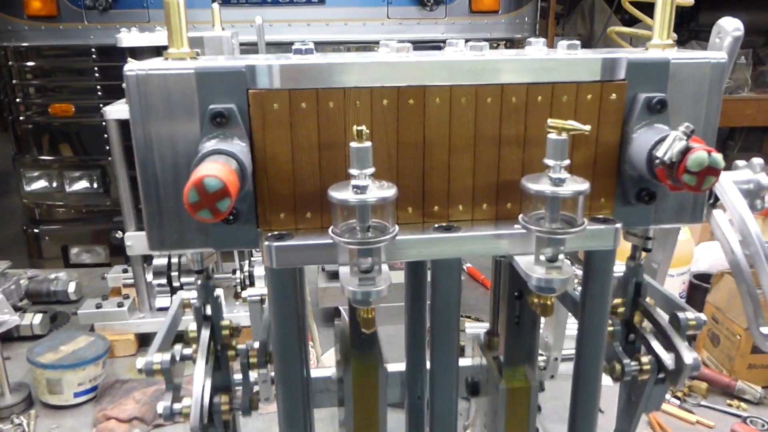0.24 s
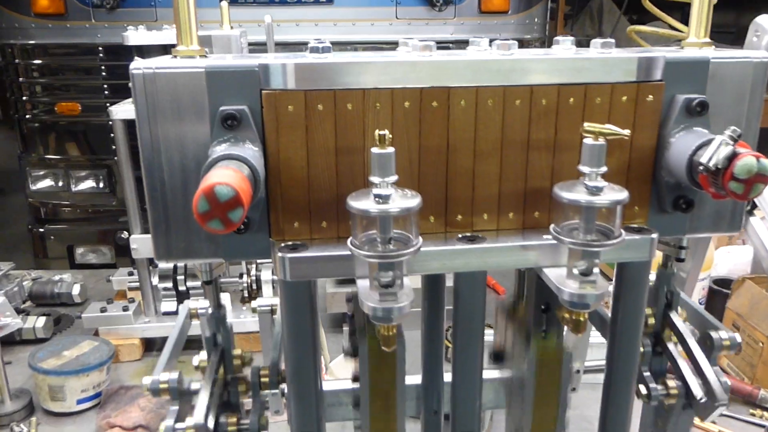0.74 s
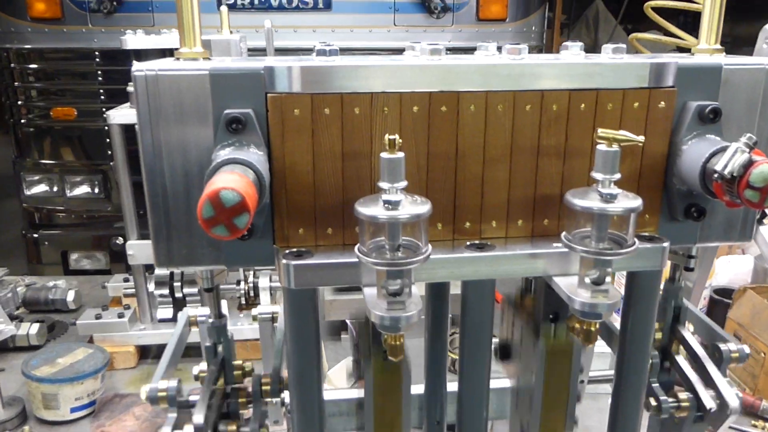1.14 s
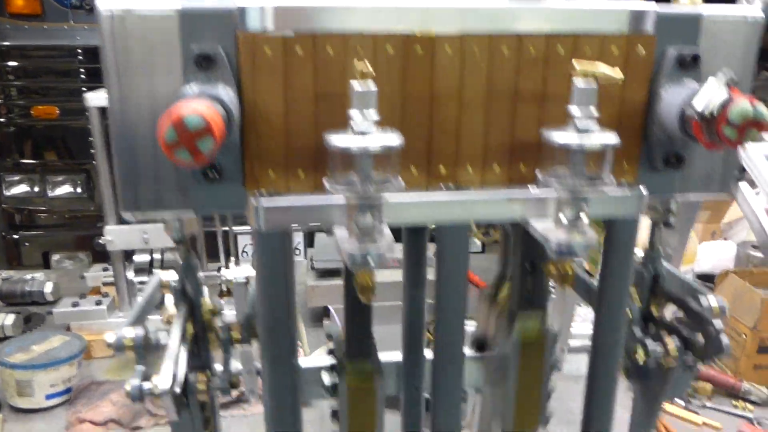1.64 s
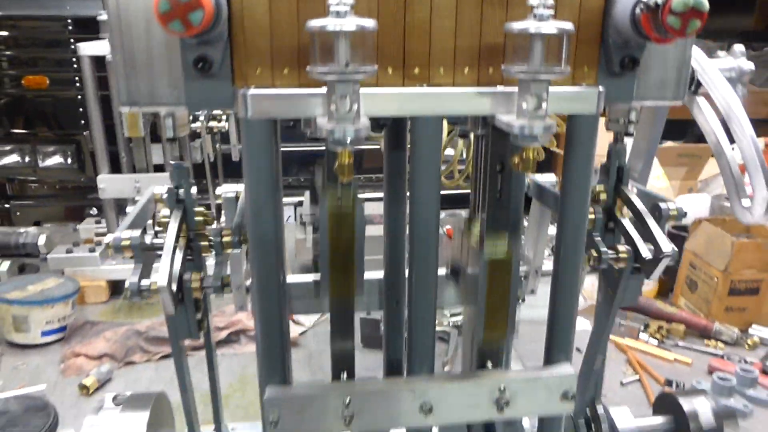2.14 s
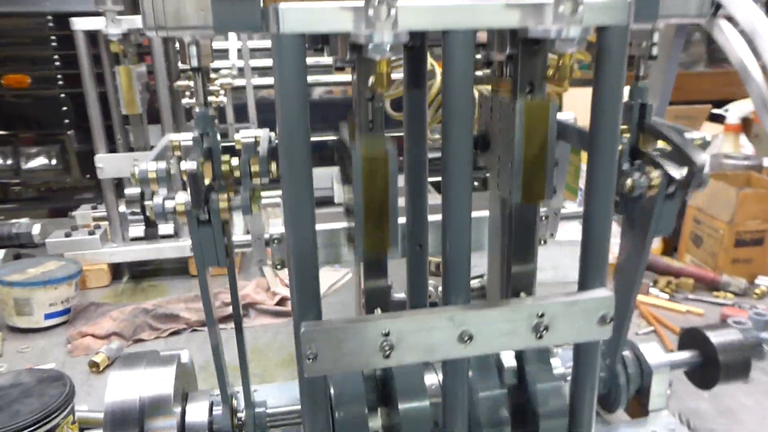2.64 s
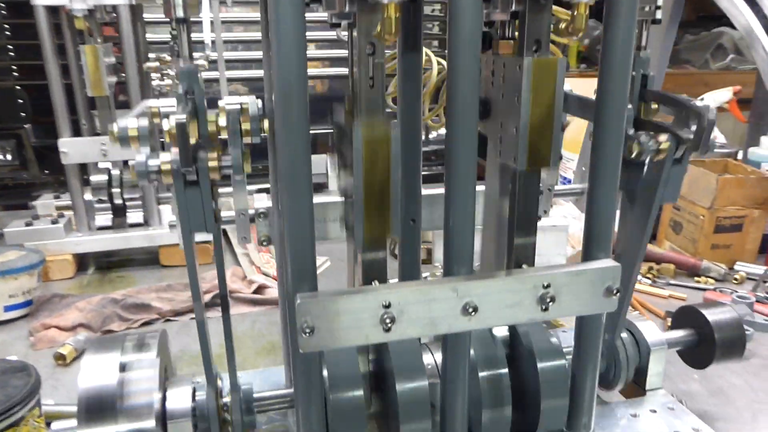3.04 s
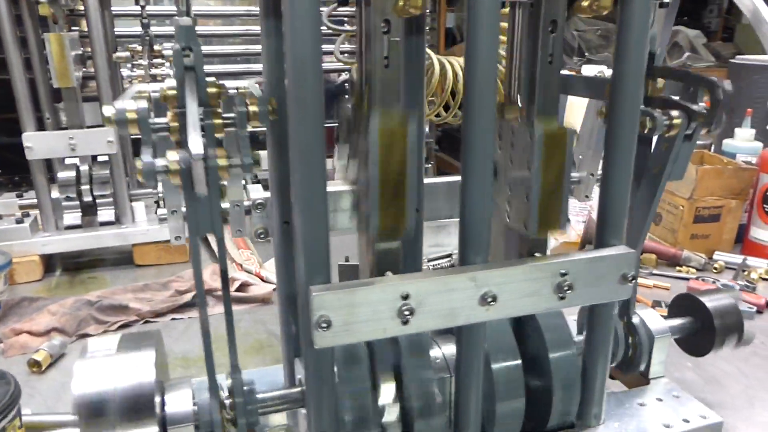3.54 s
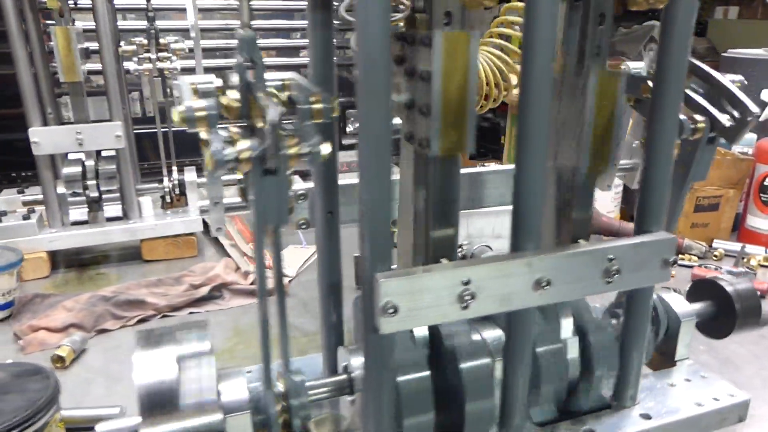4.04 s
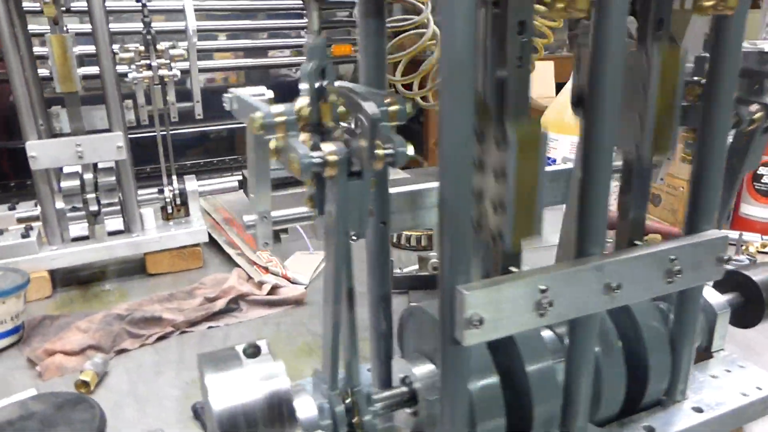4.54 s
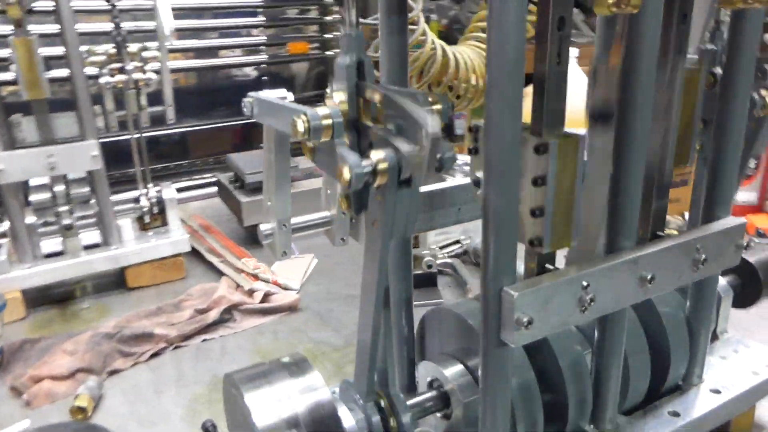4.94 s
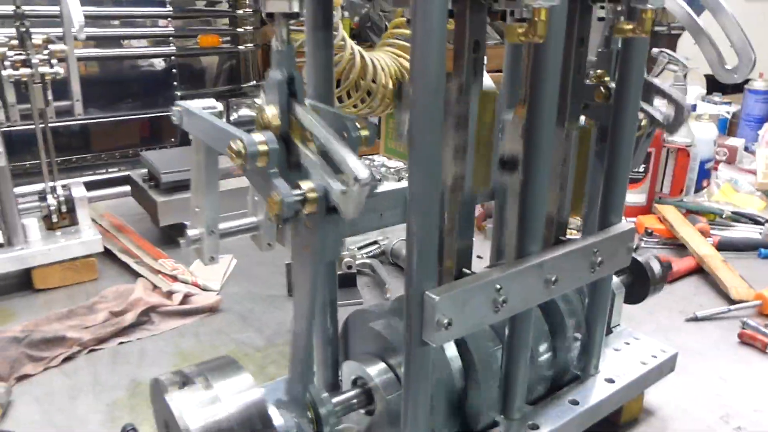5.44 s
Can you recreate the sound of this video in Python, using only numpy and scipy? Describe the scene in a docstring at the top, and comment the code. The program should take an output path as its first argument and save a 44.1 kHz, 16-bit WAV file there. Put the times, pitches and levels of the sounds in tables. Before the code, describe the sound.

Fast, even mechanical knocking from a little bench steam engine, with soft steam chuffs, leaking hiss, valve-gear rattle and stray metallic ticks.

```python
"""Small steam engine on a bench

A two-cylinder engine runs steadily, close by, at about 163 turns a minute over a rush of noise and faint tones.
Crank angle times damped double knocks, bed thuds, the valve gear's rattle and small chattering contacts.
It also shapes filtered noise into port chuffs, a leaking jet's high hiss, and rubbing and scuffing slides.
A loose link ticks and a dry guide scrapes at listed times; short diffuse reflections surround it all."""
import sys
import numpy as np
from scipy import signal
from scipy.fft import rfft, irfft
from scipy.io import wavfile

SR = 44100
rng = np.random.default_rng(int(sys.argv[2]) if len(sys.argv) > 2 else 0)


def digitize_waveform(pressure):
    """Quantize a signal to 16-bit integers and store it at the path in sys.argv[1].

    Rows of a 2-D input are taken as channels; values are limited to [-1, 1].
    """
    field = np.atleast_2d(pressure).T
    bounded = np.clip(field, -1, 1)
    quanta = np.round(bounded * 32767).astype(np.int16)
    wavfile.write(sys.argv[1], SR, quanta)


N = 250488
TIME = np.arange(N) / SR
FREQ = np.fft.rfftfreq(N, 1 / SR)

# The flywheel holds its speed, then sags a little. Each row: time in seconds, speed in turns a minute.
SPEED_RPM = [(4.17, 163.3), (5.47, 162.55)]
# Crank angles of the four dead centres. Each entry: angle in degrees.
BLOW_ANGLES_DEG = [0, 93.6, 193.4, 277.8]
# Crank angles of the bearing rebounds, one after each dead centre. Each entry: angle in degrees.
REBOUND_ANGLES_DEG = [4.3, 98.2, 197, 281.4]
# Bearing blow at each dead centre. Each row: mean pitch in Hz, time constant in ms, mean peak in dB.
BLOWS = [(397, 0.8, -18.5), (383, 0.85, -26), (391, 0.77, -21.5), (390, 0.63, -24.5)]
# Bearing rebound after each blow. Each row: mean pitch in Hz, time constant in ms, mean peak in dB.
REBOUNDS = [(550, 0.75, -24), (550, 0.38, -24), (470, 0.44, -31.5), (573, 0.42, -24)]
# Valve gear contacts, once a turn each. Each entry: mean crank angle in degrees.
RATTLE_ANGLES_DEG = [313, 314.8, 317, 318.8, 321.5, 325]
# Stray ticks of a loose link. Each row: time in seconds, pitch in Hz, time constant in ms, peak in dB.
TICKS = [(0.1924, 2360, 0.46, -23), (0.4581, 1230, 0.17, -18), (0.5467, 1900, 0.23, -17),
         (0.944, 2700, 0.55, -24.5), (1.1982, 2790, 0.46, -23.5), (2.054, 2420, 0.82, -18.5),
         (3.3808, 1120, 0.3, -25.5), (3.5036, 2380, 0.47, -23), (4.1321, 1120, 0.3, -21),
         (4.241, 2500, 0.12, -16), (4.4845, 1080, 0.35, -26), (5.1885, 566, 0.72, -20),
         (5.212, 2360, 0.29, -18.5), (5.212, 990, 0.62, -20), (5.6002, 980, 0.84, -26),
         (5.6513, 1070, 0.22, -18.5)]
# Ring of the valve links. Each row: mean pitch in Hz, mean relative level in dB, t60 in seconds.
LINK_MODES = [(200, 4.5, 0.055), (440, 9, 0.023), (690, -5, 0.014), (856, 13, 0.02), (1024, 18, 0.016),
              (1320, 10, 0.0029), (1930, -9, 0.015), (2180, 4, 0.027), (3200, -23, .006), (4600, -48, .005)]
# Drift of the jet's hiss. Each row: time in seconds, pitch in Hz, relative level in dB.
JET_DRIFT = [(0, 13300, -35), (1.3, 13440, -32), (2.65, 12900, -35.5), (3.5, 13900, -30.5),
             (3.88, 14240, -28), (4.25, 14100, -31.5), (4.55, 13550, -36.5), (5.05, 14380, -35),
             (5.68, 14400, -38.5)]
# Flow through the leaking gap. Each row: start in crank degrees, end in crank degrees, relative level in dB.
LEAKS = [(-70, 0, -14), (-12, 26, -6.5), (5, 103, -.5), (101, 111.5, 1), (102, 123, -6.5),
         (171.5, 282, -.7), (282, 296, -8)]
# Resonances of the port passages. Each row: pitch in Hz, width in Hz, relative level in dB.
PORT_MODES = [(1034, 350, 0), (2380, 290, 1), (3750, 210, 3.5), (4690, 163, 3.5), (5240, 90, 3.5),
              (5600, 480, 0.5), (7200, 100, 1.5), (9310, 200, -3.5)]
# Steam phases at a dead centre: seep, lead, admission, stroke.
# Each row: start in degrees after the dead centre, end in degrees after it.
PORT_PHASES = [(-22, 2), (-8.5, 1), (5, 29), (0, 72)]
# Flow at each dead centre. Each row: seep, lead, admission and stroke, all relative levels in dB.
PORT_FLOWS = [(-42.5, -32.5, -35.5, -45.5), (-45.5, -37.5, -44, -43.5), (-51, -43.5, -55, -43),
              (-55, -56, -50, -73)]
# Slow change in the chuffs. Each row: time in seconds, relative level in dB.
PORT_LEVEL = [(0, -5), (1.2, -2.5), (2.8, -0.6), (3.5, 2.5), (5.68, -1.5)]
# Crosshead rub. Each row: start in crank degrees, end in crank degrees, mean level in dB.
RUBS = [(-36, -3, -43), (11, 27.5, -39.5), (26, 34.5, -39.5), (64, 156, -43), (120.5, 131, -35.5),
        (141, 292, -46)]
# Crosshead scuff. Each row: start in crank degrees, end in crank degrees, mean level in dB.
SCUFFS = [(6, 22, -43), (99, 122, -45), (120, 175, -50), (196, 226, -48), (228, 236, -42), (236, 254, -42),
          (316, 345, -43)]
# A dry spot in a guide. Each row: time in seconds, length in seconds, pitch in Hz, relative level in dB.
SCRAPES = [(1.58, 0.11, 3100, -39.5), (0.95, 0.022, 2700, -47), (5.6, 0.025, 2900, -41),
           (3.766, 0.019, 3350, -29.5), (4.405, 0.015, 2460, -30)]
# Resonances of the guides. Each row: pitch in Hz, width in Hz, relative level in dB.
GUIDE_MODES = [(1015, 100, -1), (2279, 75, -0.5), (2518, 84, -2.5), (2833, 45, -4), (3300, 300, -8.5),
               (3925, 97, -9.5)]
# Resonances of the bed plate. Each row: pitch in Hz, width in Hz, relative level in dB.
BED_MODES = [(195, 30, -10.5), (323, 28, -2.5), (591, 33, -3), (970, 75, -26)]
# Spectrum of steam and running gear. Each row: frequency in Hz, relative density in dB per Hz.
RUSH_SPECTRUM = [(30, -26), (65, -32), (120, -2), (300, 0), (550, -2), (1000, -3.5), (1700, -8),
                 (2350, -7.5), (3100, -11.5), (5500, -6.5), (6600, -11.5), (11000, -11), (15000, -12.5),
                 (17000, -75)]
# Faint tones. Each row: pitch in Hz, nominal rms level in dB.
TONES = [(179, -65), (1560, -68.5), (3855, -62)]

# The crank first stands at 0 degrees, its loudest knock, just before the start
FIRST_TURN_S, TURN_COUNT = -0.0279, 16
RATTLE_SWELL_S, RATTLE_PEAK_S, RATTLE_SWELL_DB = 1.81, 0.6, 2.5
ROOM_T60_S, ROOM_DB = 0.15, -15.5
METAL_SIDE_DB, STEAM_SIDE_DB, SIDE_T60_S = -26, -21, 0.06


def undb(db):
    """Decibels to gain."""
    return 10 ** (np.asarray(db) / 20)


def unit(x):
    """Scale to rms 1."""
    return x / np.sqrt(np.mean(x ** 2))


def noise(gain):
    """Noise of rms 1 with the given gain at each frequency."""
    return unit(irfft(rfft(rng.standard_normal(N)) * gain, N))


def resonance(hz, width_hz):
    """Gain of one resonance, 1 at its centre."""
    return FREQ * width_hz / np.hypot(FREQ ** 2 - hz ** 2, FREQ * width_hz)


def body(modes):
    """Gain of several resonances, summed in power."""
    return np.sqrt(sum((undb(db) * resonance(hz, width_hz)) ** 2 for hz, width_hz, db in modes))


def flutter(rate_hz):
    """Smooth random signal of rms 1 that changes about rate_hz times a second."""
    return noise(np.exp(-(FREQ / rate_hz) ** 2))


def decay(t, t60_s):
    """Exponential decay by 60 dB in t60_s."""
    return np.exp(-np.log(1000) * t / t60_s)


def add(track, s, sound):
    """Mix a sound into the track from time s on."""
    at = int(round(s * SR)) + np.arange(len(sound))
    inside = (at >= 0) & (at < N)
    track[at[inside]] += sound[inside]


def passes(degrees):
    """Times at which the crank passes an angle, one for each turn."""
    t = FIRST_TURN_S + np.arange(0, N + SR, 100) / SR
    rpm = np.interp(t, *np.transpose(SPEED_RPM))
    turns = np.cumsum(rpm) * (t[1] - t[0]) / 60
    return np.interp(np.arange(TURN_COUNT) + degrees / 360, turns - turns[0], t)


def strokes(table, scatter_db):
    """Flow level that opens and shuts in an arch between crank angles, a little different each turn."""
    power = np.zeros(N)
    for start_deg, end_deg, db in table:
        sizes = undb(db + scatter_db * rng.standard_normal(TURN_COUNT))
        for start_s, end_s, size in zip(passes(start_deg), passes(end_deg), sizes):
            phase = np.linspace(0, np.pi, max(int((end_s - start_s) * SR), 2))
            add(power, start_s, size ** 2 * np.sin(phase) ** 2)
    return np.sqrt(power)


def add_blow(track, s, hz, ms, size):
    """A heavily damped blow centred on s: a brief vibration that swells and dies."""
    half_s = 0.012
    t = np.arange(-half_s, half_s, 1 / SR)
    envelope = 1 / np.cosh(t * 1000 / ms)
    add(track, s - half_s, size * envelope * np.cos(2 * np.pi * hz * t))


def reflections(x, t60_s):
    """Diffuse reflections: convolution with noise that dies away in t60_s."""
    t = np.arange(SR // 2) / SR
    tail = rng.standard_normal(len(t)) * decay(t, t60_s)
    return signal.fftconvolve(x, tail / np.linalg.norm(tail))[:N]


def rush(level_db=-43, flutter_db=2.5, tone_flutter_db=2):
    """The bed of steam and running gear: shaped noise and faint tones, all gently fluttering."""
    hz, db = np.transpose(RUSH_SPECTRUM)
    spectrum_db = np.interp(np.log(FREQ + 1), np.log(hz), db)
    out = noise(undb(spectrum_db)) * undb(level_db + flutter_db * flutter(30))
    for tone_hz, tone_db in TONES:
        tone = np.sqrt(2) * np.sin(2 * np.pi * tone_hz * TIME)
        out += tone * undb(tone_db + tone_flutter_db * flutter(13))
    return out


def slides(rub_scatter_db=3, steady_db=-51, scuff_scatter_db=1):
    """The crossheads rub in their guides with a gritty ring; low scuffing goes into the bed plate."""
    pressure = np.hypot(strokes(RUBS, rub_scatter_db), undb(steady_db))
    rub = noise(body(GUIDE_MODES) * resonance(3000, 4000)) * pressure
    for s, length_s, hz, db in SCRAPES:
        arch = np.sin(np.linspace(0, np.pi, int(length_s * SR)))
        scrape = noise(resonance(hz, 630) ** 2)[:len(arch)]
        add(rub, s, undb(db) * arch * scrape)
    drag = strokes(SCUFFS, scuff_scatter_db) * unit(undb(2 * flutter(300)))
    scuff = noise(body(BED_MODES) * resonance(460, 1100)) * drag
    return rub + scuff


def jet(peak_db=-1.2, skirt_db=-40.5, seep_db=-17, scatter_db=0.3):
    """Steam escapes through a narrow gap, most on each stroke: a very high hiss over a broad skirt."""
    s, pitch_hz, db = np.transpose(JET_DRIFT)
    hz = np.interp(TIME, s, pitch_hz)
    level_db = np.interp(TIME, s, db)
    # crossfade fixed bands so that the peak glides
    centres_hz = np.linspace(pitch_hz.min(), pitch_hz.max(), 4)
    hiss = np.zeros(N)
    for centre_hz, share in zip(centres_hz, np.eye(len(centres_hz))):
        weight = np.sqrt(np.interp(hz, centres_hz, share))
        hiss += weight * noise(resonance(centre_hz, 3600) ** 2)
    # the skirt's level drifts half as many dB as the peak's
    skirt = noise(resonance(8000, 9000) ** 2) * undb(skirt_db + (level_db - db.mean()) / 2)
    # the gap never quite seals
    flow = np.hypot(strokes(LEAKS, scatter_db), undb(seep_db))
    return (hiss * undb(level_db + peak_db) + skirt) * flow


def ports(rough_db=1.5, scatter_db=1.0):
    """Steam chuffs through the valve ports at each dead centre and rings the passages."""
    chuffs = []
    for centre_deg, flows_db in zip(BLOW_ANGLES_DEG, PORT_FLOWS):
        for (start_deg, end_deg), db in zip(PORT_PHASES, flows_db):
            chuffs.append((centre_deg + start_deg, centre_deg + end_deg, db))
    level_db = np.interp(TIME, *np.transpose(PORT_LEVEL))
    roughness_db = rough_db * flutter(360)
    return noise(body(PORT_MODES)) * strokes(chuffs, scatter_db) * undb(level_db + roughness_db)


def chatter(count, floor_db, low_hz, high_hz, ms, spread_db=6):
    """Small loose contacts: damped blows at random through the middle of the turns."""
    out = np.zeros(N)
    for turn, angle, pitch, size in rng.random((count, 4)):
        s = passes(60 + 190 * angle)[int(turn * TURN_COUNT)]
        hz = low_hz * (high_hz / low_hz) ** pitch
        add_blow(out, s, hz, ms, undb(floor_db + spread_db * size))
    return out


def link_ring(detune=0.056, scatter_db=2):
    """One contact in the valve links; each pushes the modes with its own strength and direction."""
    t = np.arange(SR // 16) / SR
    ring = np.zeros(len(t))
    for (hz, db, t60_s), (a, b, c) in zip(LINK_MODES, rng.standard_normal((len(LINK_MODES), 3))):
        push = np.sign(c) * undb(db + scatter_db * a)
        ring += push * np.sin(2 * np.pi * hz * (1 + detune * b) * t) * decay(t, t60_s)
    return ring / np.sqrt(sum(undb(db) ** 2 for _, db, _ in LINK_MODES))


def valve_gear(jitter_s=0.00033, scatter_db=1.7, rattle_db=-31.0, fade_db=-9, tick_ring_db=-16,
               grit_db=-35.5, grit_hz=1500, grit_width_hz=2200, grit_t60_s=0.081):
    """Once a turn a link snaps across its slack with a rasp and bounces; stray ticks ring the links."""
    out, rasp = np.zeros(N), np.zeros(N)
    t = np.arange(SR // 10) / SR
    snaps_s = passes(RATTLE_ANGLES_DEG[0])
    # the rattle waxes and wanes over several turns
    swell_db = RATTLE_SWELL_DB * np.cos(2 * np.pi * (snaps_s - RATTLE_PEAK_S) / RATTLE_SWELL_S)
    for s, db in zip(snaps_s, swell_db):
        add(rasp, s, undb(grit_db + db) * decay(t, grit_t60_s))
    for degrees, late in zip(RATTLE_ANGLES_DEG, np.linspace(0, 1, len(RATTLE_ANGLES_DEG))):
        bounce_db = rattle_db + fade_db * late ** 3
        for s, db, (a, b) in zip(passes(degrees), swell_db, rng.standard_normal((TURN_COUNT, 2))):
            add(out, s + jitter_s * a, undb(bounce_db + db + scatter_db * b) * link_ring())
    for s, hz, ms, db in TICKS:
        add_blow(out, s, hz, ms, undb(db))
        add(out, s, undb(db + tick_ring_db) * link_ring())
    return out + rasp * noise(resonance(grit_hz, grit_width_hz) ** 2)


def thuds(hz=135, ms=4.6, level_db=-42, detune=0.23):
    """The bed plate answers each rebound and the rattle with a soft low thud."""
    out = np.zeros(N)
    for degrees in REBOUND_ANGLES_DEG + [np.mean(RATTLE_ANGLES_DEG)]:
        for s, a in zip(passes(degrees), rng.standard_normal(TURN_COUNT)):
            add_blow(out, s, hz * (1 + detune * a), ms, undb(level_db))
    return out


def knocks(scatter_db=0.92, detune=0.044):
    """The load reverses at each dead centre: the oiled bearing bumps one way, then back."""
    out = np.zeros(N)
    bumps = ((BLOW_ANGLES_DEG, BLOWS, 1), (REBOUND_ANGLES_DEG, REBOUNDS, -1))
    for angles_deg, table, direction in bumps:
        for degrees, (hz, ms, db) in zip(angles_deg, table):
            for s, (a, b) in zip(passes(degrees), rng.standard_normal((TURN_COUNT, 2))):
                size = direction * undb(db + scatter_db * b)
                add_blow(out, s, hz * (1 + detune * a), ms, size)
    return out


def scene():
    """The engine straight ahead in a dry, cluttered shop."""
    steam = rush() + slides() + jet() + ports()
    pins = chatter(count=40, floor_db=-43, low_hz=810, high_hz=2930, ms=0.77)
    rods = chatter(count=50, floor_db=-41, low_hz=190, high_hz=390, ms=1.32)
    metal = pins + rods + valve_gear() + thuds() + knocks()
    direct = metal + steam
    mid = direct + undb(ROOM_DB) * reflections(direct, ROOM_T60_S)
    # near reflections off the frame and the bench differ between left and right
    side = reflections(undb(METAL_SIDE_DB) * metal + undb(STEAM_SIDE_DB) * steam, SIDE_T60_S)
    return np.array([mid + side, mid - side])


def record(dry):
    """Thin the bass and cut the top steeply, with filters run both ways for zero phase."""
    bass_cut = signal.butter(1, 115, "high", fs=SR, output="sos")
    top_cut = signal.ellip(8, 0.1, 60, 15480, fs=SR, output="sos")
    return signal.sosfiltfilt(np.vstack([bass_cut, top_cut]), dry, padtype="even", padlen=SR // 20)


dry = scene()
out = record(dry)
digitize_waveform(out)
```